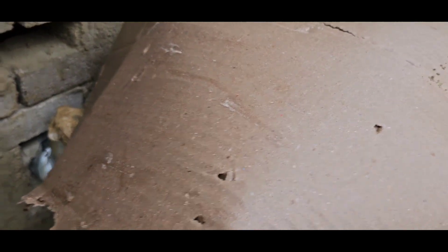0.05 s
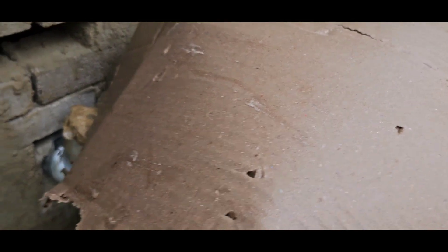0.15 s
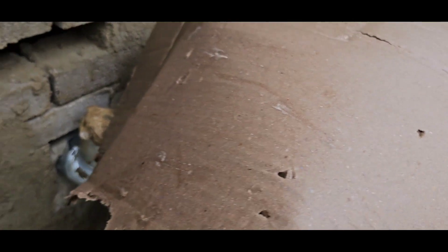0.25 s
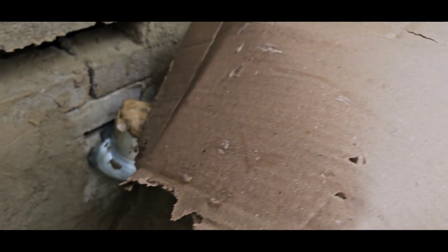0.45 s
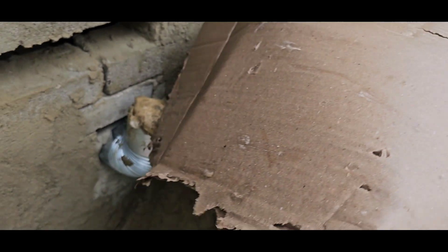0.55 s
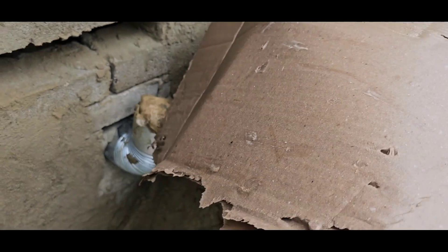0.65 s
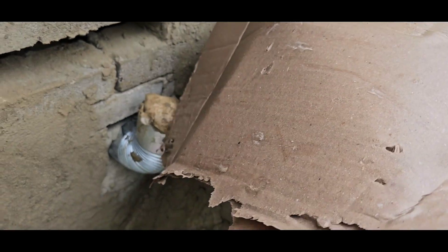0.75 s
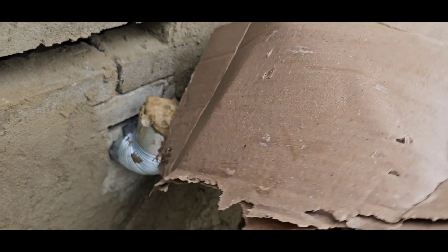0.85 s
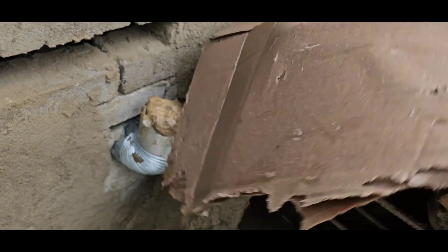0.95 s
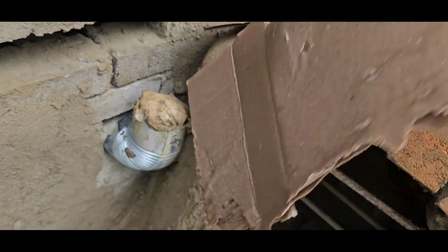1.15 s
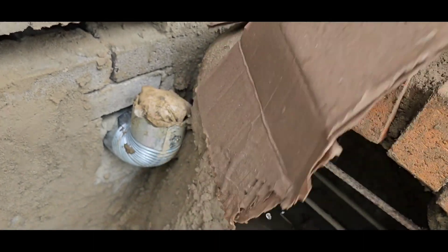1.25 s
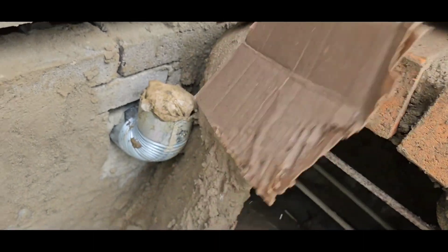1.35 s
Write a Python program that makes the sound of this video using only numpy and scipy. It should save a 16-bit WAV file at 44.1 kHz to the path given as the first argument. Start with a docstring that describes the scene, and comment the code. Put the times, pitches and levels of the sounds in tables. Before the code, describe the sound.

Close by, two dull, bouncing knocks come from a cardboard sheet being shifted on bricks. Small crumbs crack and tap the wall, and a soft scrape follows as the sheet slides aside, with faint hiss behind.

```python
"""Working a slab loose

Close by, a clay-smeared slab is worked loose from brickwork and swung aside. It knocks twice against
the bricks, bouncing each time, and settles with a low thump; grit cracks under it. Then its edge drags
softly along the mortar, shedding crumbs, over a low handling rumble and a faint hiss."""
import sys
import numpy as np
from scipy import signal
from scipy.io import wavfile

SR = 44100
rng = np.random.default_rng(int(sys.argv[2]) if len(sys.argv) > 2 else 0)


def store_pcm(level_fs):
    """Save levels as 16-bit WAV."""
    pcm = np.round(np.clip(level_fs, -1, 1) * 32767).astype(np.int16)
    wavfile.write(sys.argv[1], SR, np.atleast_2d(pcm).T)


N = 61739
TIME = np.arange(N) / SR

# In the tables, "fade" is the time to die away by 60 dB and "pan" is left level minus right level.
# A "colour" only shapes a noise from low to high; its loudness is set elsewhere.
# how alike the noise is on both sides: f/Hz, likeness (1 = same, -1 = opposite)
LEFT_RIGHT_LIKENESS = [(40, 0.73), (200, 0.95), (550, 0.83), (1100, 0.14), (2200, 0.13), (5000, 0.37),
                       (12000, -0.73)]
# still air and handling rumble: f/Hz, level/dB
AIR_COLOUR = [(30, 0.5), (120, -3), (280, -1.5), (500, -8.5), (1000, -12), (2200, -17.5), (3500, -23),
              (5000, -17.5), (8000, -33), (12000, -31.5), (15500, -48)]
RUMBLE_COLOUR = [(22, 0), (42, 1.5), (70, 1), (120, -12.5), (250, -36), (600, -64), (2000, -49.5)]
# the rumble swells and sinks: t/s, level/dB
RUMBLE_LEVELS = [(0, -50.5), (.15, -43), (.3, -49), (.47, -65), (.68, -40.5), (.8, -48), (.9, -42),
                 (.98, -34.5), (1.06, -42.5), (1.13, -39), (1.17, -44), (1.26, -40.5), (1.4, -49)]
# the edge rubbing on mortar: f/Hz, level/dB
SCRAPE_COLOUR = [(150, -19), (400, -3), (900, -1), (1400, -1), (2000, 2), (3000, -5), (6000, -10),
                 (11000, -10), (15500, -30)]
# how loudly the edge drags: t/s, level/dB
SCRAPE_LEVELS = [(0, -54.5), (.14, -53), (.3, -56), (.41, -52.5), (.48, -57.5), (.67, -49), (.8, -57),
                 (.92, -52), (.96, -45.5), (1.02, -46.5), (1.06, -45.5), (1.1, -44.5), (1.15, -51.5),
                 (1.235, -40), (1.28, -47), (1.4, -54)]
# breaking grit: f/Hz, level/dB
GRIT_COLOUR = [(500, -35), (1800, 6.5), (3500, 3), (5500, -12.5), (8000, -3), (11500, -0.5), (15500, -20)]
# each crack of grit: t/s, level/dB, fade/s, pan/dB
GRIT_CRACKS = [(0.1516, -42.5, 0.02, 18.5), (0.2053, -25.5, 0.059, 3), (0.23, -37.5, 0.085, -2),
               (0.53, -40, 0.16, 3.5), (0.5776, -32, 0.047, 3), (0.5883, -34, 0.03, 0),
               (0.9433, -33.5, 0.046, 2), (0.992, -44.5, .03, 5), (1.046, -46, 0.023, 4),
               (1.087, -39, 0.041, 10), (1.1046, -29.5, 0.029, 2), (1.223, -40, 0.032, -10)]
# a small chip's own tones: f/Hz, level/dB, fade/s
CHIP_TONES = [(1376, 0.5, 0.042), (1450, -4.5, 0.029), (1650, -17, 0.018)]
# chips tap the wall: t/s, level/dB, pitch factor, pan/dB
CHIP_TAPS = [(0.15, -39, 0.91, 7), (0.246, -23.5, 1.44, 5.5), (0.5892, -30.5, 1.92, 8),
             (0.947, -60, 1.85, -1), (0.956, -45, 3.7, 2), (0.994, -47.5, 1.5, 19), (1.047, -41.5, 0.67, 8),
             (1.061, -45, 0.8, -3), (1.1008, -29.5, 1.055, 8.5), (1.204, -33, 1.35, 11)]
# the slab's slow wobbles: f/Hz, level/dB, fade/s
WOBBLE_TONES = [(68.8, -8, 0.15), (115.3, 1.5, 0.085), (190, -21.5, 0.037)]
# the slab's weight shifts: t/s, level/dB, pitch factor
WEIGHT_SHIFTS = [(0.2424, -15.5, 1.487), (0.378, -29, 1.62), (0.536, -23.5, 2.06), (0.587, -21.5, 2.56),
                 (0.6201, -18.5, 1.1), (0.66, -31, 0.65), (0.705, -34, 1.2), (0.945, -29.5, 1.18),
                 (0.976, -35, 0.89), (1.061, -35.5, 2.3), (1.118, -27.5, 0.46), (1.2, -27.5, 1.16),
                 (1.212, -31.5, 1.92), (1.329, -36.5, 2.02)]
# a hard brick's own tones: f/Hz, level/dB, fade/s
BRICK_TONES = [(1148, -8.5, 0.062), (1442, -19, 0.045), (1578, 2.5, 0.035), (1740, -8, 0.06),
               (3280, -8, 0.036), (3698, -9, 0.035)]
# brick is hit through the clay: t/s, level/dB, pitch factor, pan/dB
BRICK_HITS = [(0.2066, -17.5, 1.0, 13.5), (0.2416, -32, .9, 0), (0.5364, -20.5, 0.95, 6)]
# loose bricks rattling: f/Hz, level/dB
RATTLE_COLOUR = [(50, -30), (150, -5.5), (340, -6.5), (550, 1.5), (900, -6.5), (1500, -2), (2300, -14),
                 (3600, -17), (5500, -56), (15000, -45)]
# how long they ring: f/Hz, fade/s
RATTLE_FADES = [(100, .17), (300, 0.2), (700, 0.17), (1500, 0.11), (4000, 0.077)]
# where they sound from: f/Hz, pan/dB
RATTLE_PANS = [(250, 5.5), (900, 13.5), (1800, 16.5), (4000, 10)]
# the slab's own tones: f/Hz, level/dB, fade/s
SLAB_TONES = [(182.9, -20, 0.25), (259.4, -19, 0.16), (317, -24.5, 0.22), (435.6, -19, 0.16),
              (521.5, -2, 0.086), (629, -12, 0.043), (869.3, -10.5, 0.092), (1138, -15, 0.088),
              (1366, -8, 0.034)]
# knocks and bounces: t/s, clack level/dB, clack f/Hz, ring level/dB, treble limit f/Hz,
# pitch factor, rattle level/dB, fade factor, pan/dB
SLAB_KNOCKS = [(0.2072, -3.5, 940, -4, 2420, 0.99, -24, 0.89, 2),
               (0.242, -5.5, 636, -8.5, 880, 0.96, -19.5, 0.85, -4),
               (0.382, -27.5, 746, -27, 850, 1.01, -32, 0.62, -6),
               (0.5361, -.5, 760, -9.5, 1600, 1.015, -14, 0.8, 0),
               (0.5781, -7.5, 880, -20, 1600, 1.02, -24.5, .6, 1),
               (0.5867, -13.5, 550, -17, 885, 0.97, -33, 1.01, -6.5)]


def from_db(db):
    """Turn decibels into a number to multiply by."""
    return 10 ** (np.asarray(db) / 20)


def unit_power(x):
    """Scale a sound to an average power of one."""
    return x / np.sqrt(np.mean(x ** 2) + 1e-20)


def at_hz(table, hz):
    """Look up a frequency in a table, with octaves evenly spaced."""
    freqs, values = np.transpose(table)
    return np.interp(np.log(hz), np.log(freqs), values)


def loudness(table):
    """A gain that glides between (t/s, level/dB) points."""
    return from_db(np.interp(TIME, *np.transpose(table)))


def pan(db):
    """Left and right gains; positive leans left."""
    return from_db(np.array([[db], [-db]]) / 2)


def filtered(x, hz, kind):
    """Keep the "low" side, the "high" side or a "band" of a sound."""
    return signal.sosfilt(signal.butter(2, hz, kind, fs=SR, output="sos"), x)


def noise_bands(colour):
    """Stereo noise in half-octave bands, as (f/Hz, sound); together their power is one."""
    edges = 20 * 2 ** np.arange(0, 10, .5)
    white = rng.standard_normal((2, 2, N + SR // 2))
    bands = []
    for k, (low, high) in enumerate(zip(edges, edges[1:])):
        top = 1.1 * high if high == edges[-1] else high
        shared, opposed = filtered(white[k % 2], [low, top], "band")[:, -N:]
        hz = np.sqrt(low * high)
        alike = at_hz(LEFT_RIGHT_LIKENESS, hz)
        stereo = np.sqrt(1 + alike) * shared + np.sqrt(1 - alike) * opposed * [[1], [-1]]
        bands.append((hz, from_db(at_hz(colour, hz)) * stereo))
    total = np.std(sum(band for _, band in bands))
    return [(hz, band / total) for hz, band in bands]


def noise(colour):
    """Stereo noise of a given colour."""
    return sum(band for _, band in noise_bands(colour))


def rising(t, rise_s):
    """A gain that climbs from zero towards one, starting at time t."""
    return 1 - np.exp(-np.maximum(TIME - t, 0) / rise_s)


def fading(t, fade_s):
    """A gain that jumps to one at time t, then falls 60 dB in fade_s."""
    return (TIME >= t) * np.exp(-np.log(1000) * np.clip((TIME - t) / fade_s, 0, 5))


def struck(tones, t, pitch, rise_s=0.00026):
    """An object hit at time t: its tones start together and each dies away."""
    ring = sum(from_db(db) * fading(t, fade_s) * np.cos(2 * np.pi * hz * pitch * (TIME - t))
               for hz, db, fade_s in tones)
    return rising(t, rise_s) * ring


def background(air_db=-46.5, whine_db=-62.5, whine_band_hz=(6150, 6310)):
    """A low handling rumble, the hiss of still air and a thin, high whine."""
    whine = unit_power(filtered(rng.standard_normal((2, N)), whine_band_hz, "band"))
    rumble = loudness(RUMBLE_LEVELS) * pan(db=-6.5) * noise(RUMBLE_COLOUR)
    return rumble + from_db(air_db) * noise(AIR_COLOUR) + from_db(whine_db) * whine


def scrape(grains_per_s=2600, grain_s=0.0015, spread_db=4.0, smooth_part=0.4):
    """Sand grains catch and slip under the dragging edge, each making a tiny burst of noise."""
    slips = rng.random(N) < grains_per_s / SR
    strengths = from_db(spread_db * np.minimum(rng.exponential(1, N), 5))
    decay = np.exp(-1 / (grain_s * SR))  # gives each slip a short tail
    grain_power = unit_power(signal.lfilter([1], [1, -decay], (slips * strengths) ** 2))
    rubbing = noise(SCRAPE_COLOUR) * (np.sqrt(grain_power) + smooth_part)
    return loudness(SCRAPE_LEVELS) * pan(db=4) * unit_power(rubbing)


def crumbs():
    """Grit bursts under the edge and loose chips tap the wall."""
    bursts = sum(from_db(db) * pan(pan_db) * fading(t, fade_s) for t, db, fade_s, pan_db in GRIT_CRACKS)
    taps = sum(from_db(db) * pan(pan_db) * struck(CHIP_TONES, t, pitch)
               for t, db, pitch, pan_db in CHIP_TAPS)
    return bursts * noise(GRIT_COLOUR) + taps


def thumps():
    """The slab's weight shifts and it wobbles briefly."""
    return sum(from_db(db) * struck(WOBBLE_TONES, t, pitch, rise_s=0.0023)
               for t, db, pitch in WEIGHT_SHIFTS)


def clinks(left_lag_s=0.0002):
    """Hard brick rings brightly for a moment, reaching the left side a little later."""
    out = 0
    for t, db, pitch, pan_db in BRICK_HITS:
        ring = np.array([struck(BRICK_TONES, start, pitch) for start in (t + left_lag_s, t)])
        out = out + from_db(db) * pan(pan_db) * ring
    return out


def clack(t, hz, delay_s=0.00124, width_cycles=0.59, glide=0.22):
    """Two faces meet and bend for a cycle or two; the high tones arrive first."""
    cycles = hz * (TIME - t - delay_s)
    falling_tone = -np.cos(2 * np.pi * (cycles - glide * cycles ** 2))
    return falling_tone * np.exp(-(cycles / width_cycles) ** 2)


def knocks(left_lag_s=0.00007, bass_cut_hz=69):
    """Each knock clacks, rings the slab and shakes the bricks; wet clay dulls the ring and rattle."""
    bricks = noise_bands(RATTLE_COLOUR)
    out = 0
    for t, clack_db, clack_hz, ring_db, treble_hz, pitch, rattle_db, stretch, pan_db in SLAB_KNOCKS:
        shaking = sum(band * fading(t, stretch * at_hz(RATTLE_FADES, hz)) * pan(at_hz(RATTLE_PANS, hz))
                      for hz, band in bricks)
        rattle = rising(t, rise_s=0.002) * shaking
        tones = [(hz, db, stretch * fade_s) for hz, db, fade_s in SLAB_TONES]
        ring = np.array([struck(tones, start, pitch) for start in (t + left_lag_s, t)])
        dulled = filtered(from_db(ring_db) * ring + from_db(rattle_db) * rattle, treble_hz, "low")
        out = out + pan(pan_db) * dulled + from_db(clack_db) * clack(t, clack_hz)
    return filtered(out, bass_cut_hz, "high")


def scene(left_lag_s=0.000215):
    """Add up all the sounds; the quiet ones reach the left side a little later."""
    left, right = crumbs() + scrape() + background()
    late_left = np.interp(TIME - left_lag_s, TIME, left)
    return np.array([late_left, right]) + thumps() + clinks() + knocks()


def record(dry, treble_cut_hz=15600):
    """Round off the loudest peaks and cut the highest treble."""
    rounded = dry / (1 + dry ** 8) ** (1 / 8)
    return signal.sosfilt(signal.cheby1(12, .2, treble_cut_hz, fs=SR, output="sos"), rounded)


dry = scene()
out = record(dry)
store_pcm(out)
```